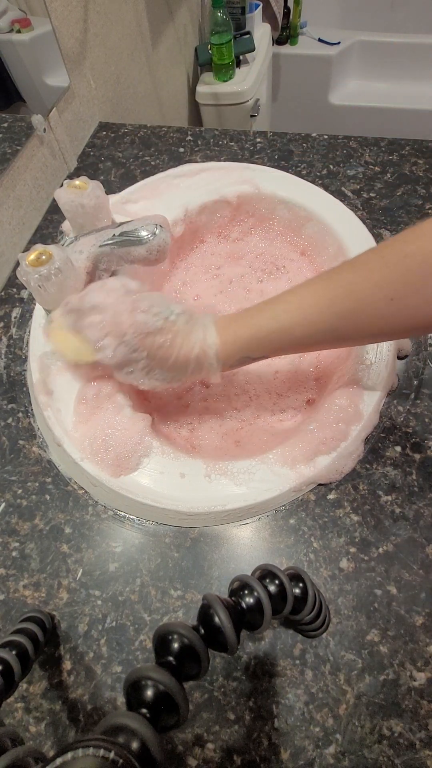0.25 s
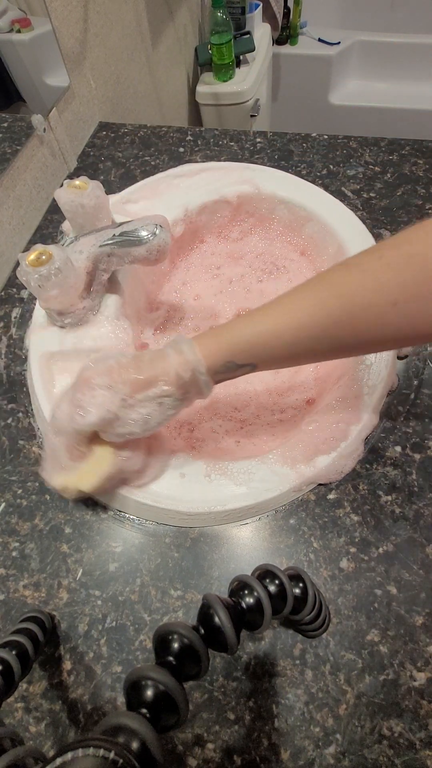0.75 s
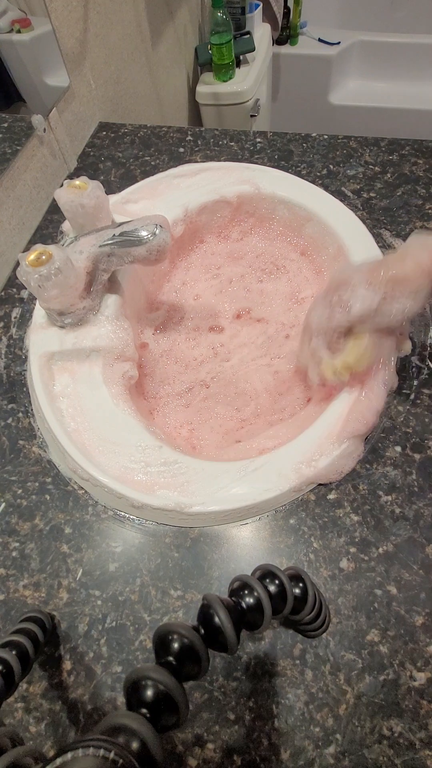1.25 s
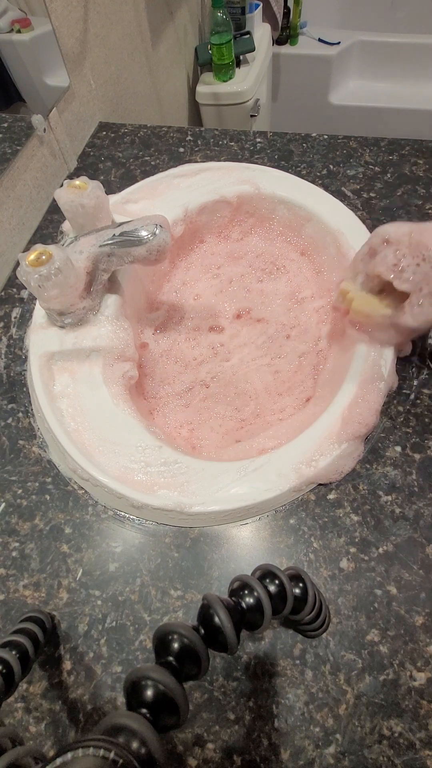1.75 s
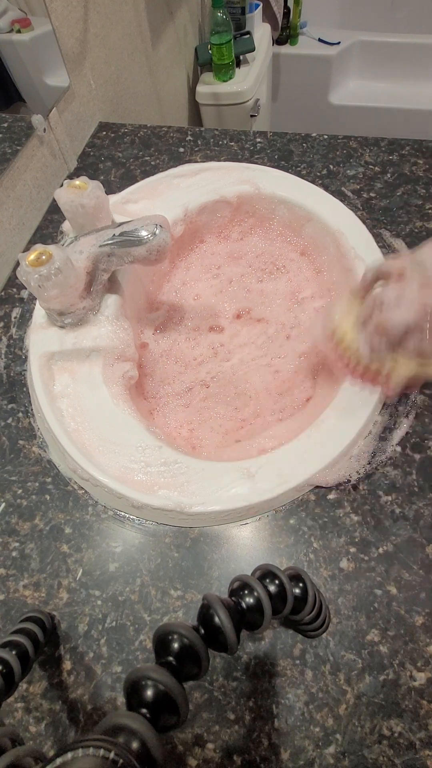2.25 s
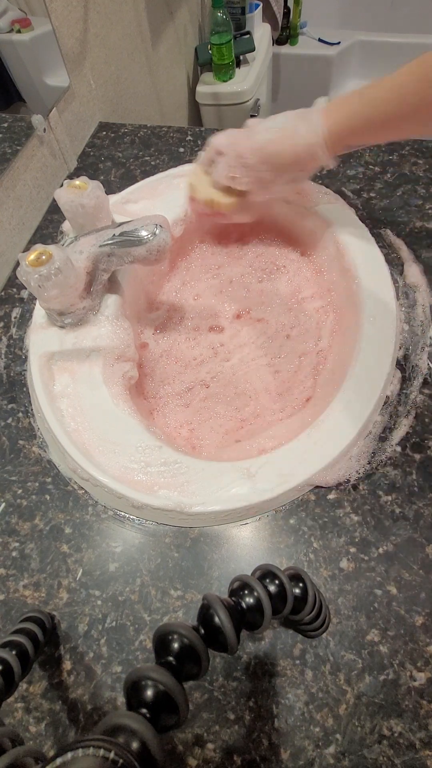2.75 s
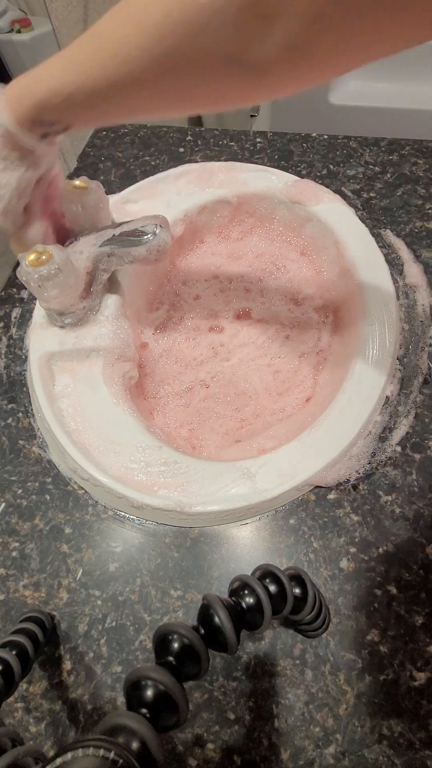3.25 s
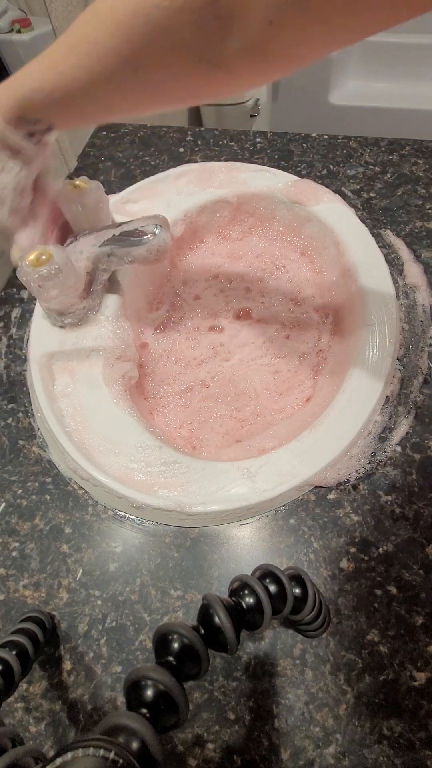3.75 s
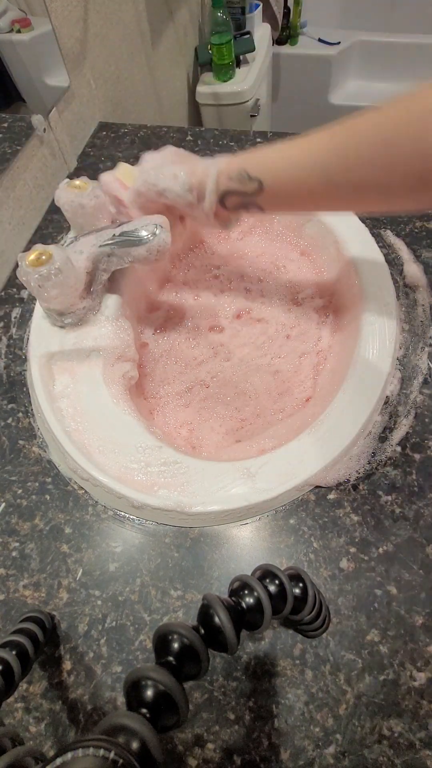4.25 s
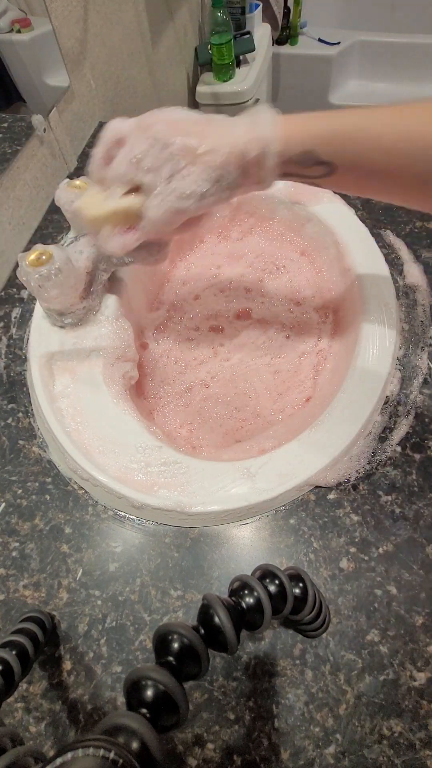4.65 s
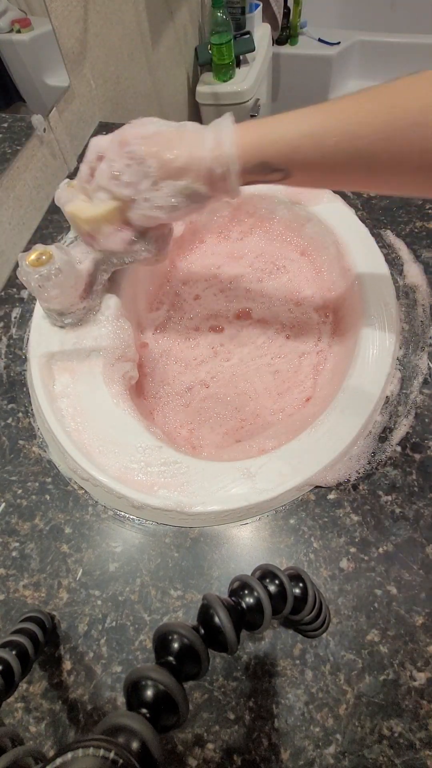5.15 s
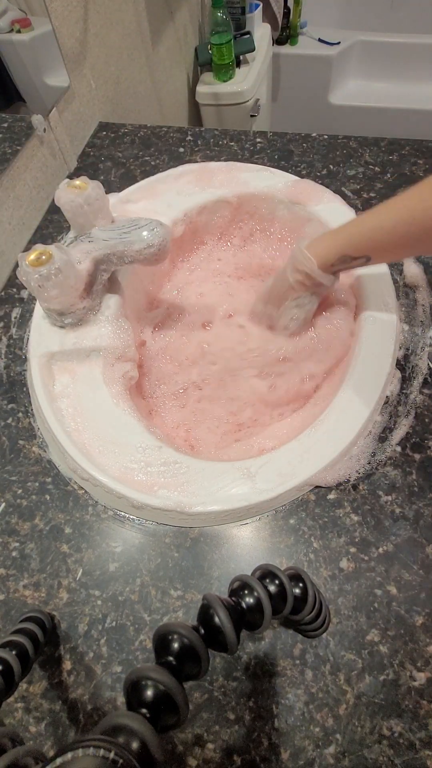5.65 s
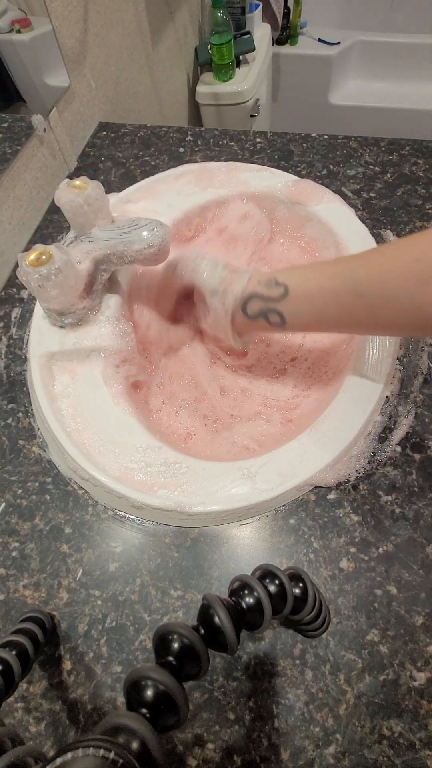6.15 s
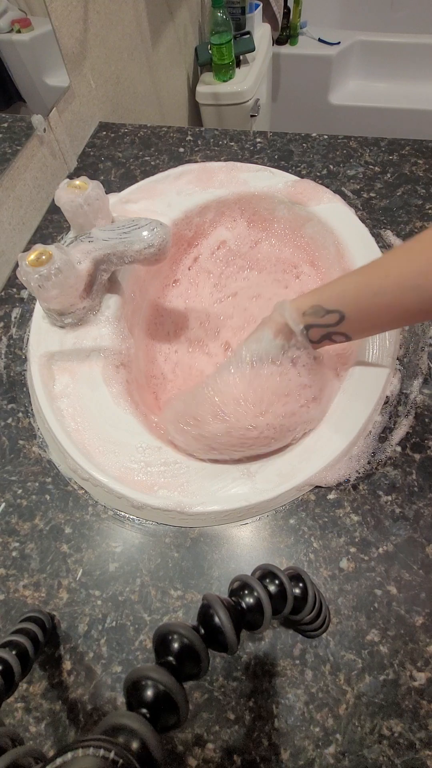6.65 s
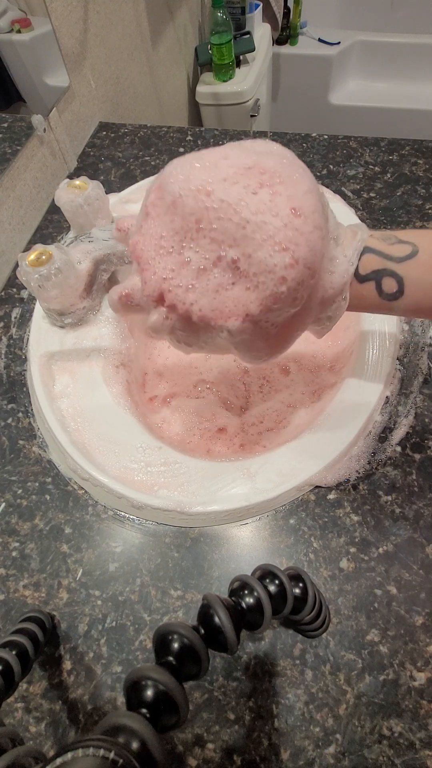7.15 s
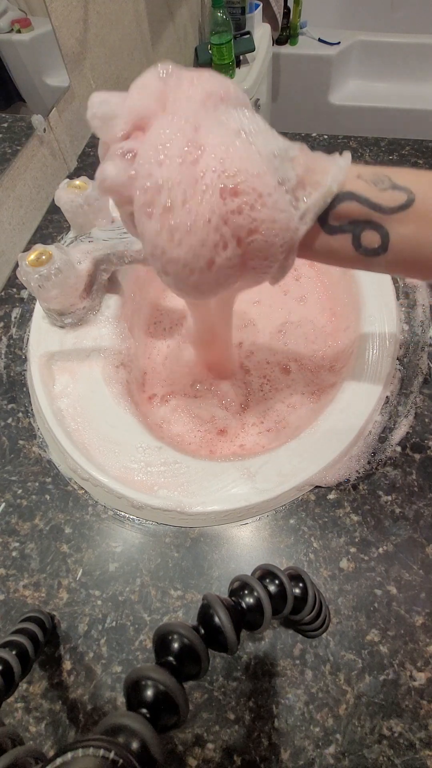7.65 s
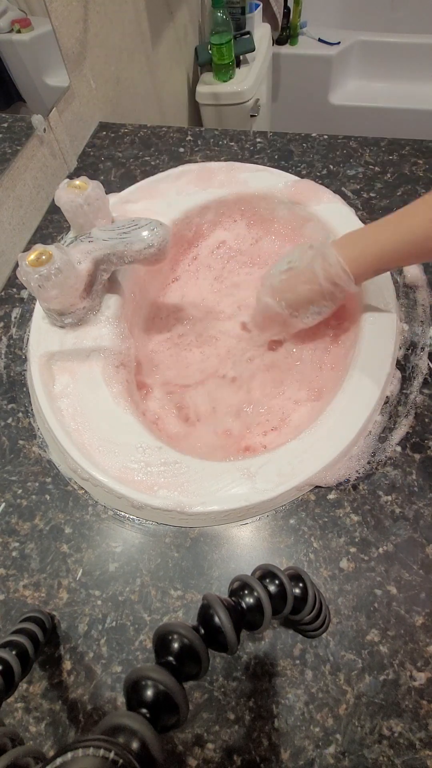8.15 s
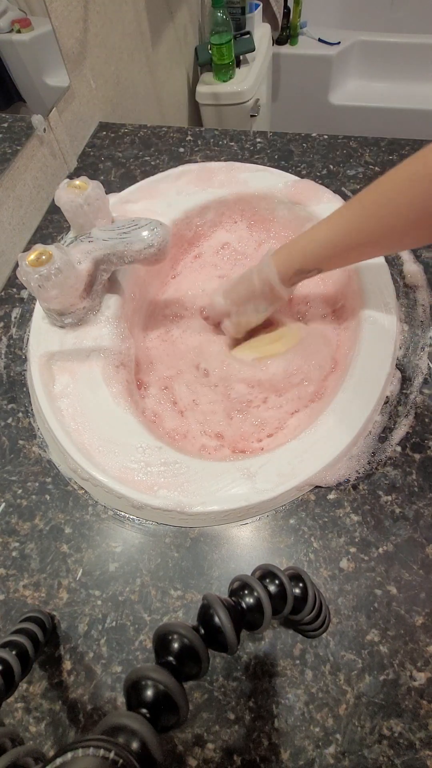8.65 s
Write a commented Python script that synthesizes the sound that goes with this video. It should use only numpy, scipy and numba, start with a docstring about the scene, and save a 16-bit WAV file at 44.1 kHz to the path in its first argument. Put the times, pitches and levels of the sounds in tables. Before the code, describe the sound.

In a small tiled bathroom, heard close by a phone on a stand, a lathered sponge rubs a basin. From 0 to 1.2 seconds wiping makes dense, wet fizz and crackle with soft low bumps; around 1.2 a brief wet squeak falls in pitch. The foam thins until a firm thud near 2.1 starts another bright, crisp wipe, fading by 3. At 3.3 a sharp bubble snap and knock begin squelchier strokes, with thuds near 3.75 and 3.9, easing by 4.6. Brisk rubbing and bumps return from 4.7 to 5.5. Then only faint crackle, tiny ticks and slight knocks remain until 7.3. From 7.4 to 8.1 a thick, hollow, gurgling squeeze swells. After a tiny lull, a thud and wet burst at 8.2 dwindle to sparse fizz by 8.9. Faint room hush lies beneath; the fizz leans right.

```python
"""Dense swarms of foam bubbles burst as a gloved hand works a lathered sponge round a bathroom basin.
It wipes, dips into the foam, squeezes and plunges back; each bubble is a short dying sine.
Driven resonances make the thuds and rumble of basin, counter and stand, heard by a phone with two ports.
A few large bubbles snap, air whistles through pores, and one wet squeak falls in pitch.
The ports colour the fizz differently; a short tiled echo and a faint room hush of noise complete it."""
import sys
import numpy as np
from scipy import signal
from scipy.fft import rfft, irfft
from scipy.io import wavfile
from scipy.ndimage import uniform_filter1d
from numba import njit

SR = 44100
rng = np.random.default_rng(int(sys.argv[2]) if len(sys.argv) > 2 else 0)


def gain_from_db(level_db):
    """Convert decibel levels to linear amplitude factors (20 dB per decade)."""
    decades = np.asarray(level_db, float) / 20
    return 10 ** decades


def file_out(sig):
    """Save sig as 16-bit WAV at sys.argv[1]."""
    # one column per channel
    cols = np.atleast_2d(sig).T
    # limit, then scale
    lim = np.clip(cols, -1, 1)
    pcm = np.round(lim * 32767).astype(np.int16)
    wavfile.write(sys.argv[1], SR, pcm)


N = 392040  # samples
HZ = np.fft.rfftfreq(N, 1 / SR)

# Bubble families: small, air pockets, large, fine, finest film, lone ticks. Each row: lowest and highest
# pitch in Hz, bursts per second, typical cycles rung, basic size scatter in dB.
BUBBLE_FAMILIES = [(2210, 5700, 9000, 2.43, 2.5), (433, 1204, 2000, 4.04, 2.0),
                   (1150, 2830, 4000, 5.6, 2.0), (5870, 8940, 9000, 2.4, 3), (9970, 19300, 6000, 3.2, 0.5),
                   (1500, 9000, 200, 1.5, 2.5)]
# How hard the sponge works the lather, one table per wipe, stir, squeeze or plunge.
# Each row: time in seconds, level of the small bubbles in dB.
STROKE_LEVELS = [
    [(0.0, -50), (0.03, -58), (0.074, -48), (0.14, -65.5), (0.208, -58), (0.22, -48.5), (0.43, -49),
     (0.508, -45.5), (0.572, -50), (0.654, -46.5), (0.662, -52), (0.7, -51)],
    [(0.71, -52.5), (1.236, -47), (1.244, -53), (1.426, -55.5), (1.444, -52.5), (1.564, -62), (1.638, -56),
     (1.774, -63), (1.84, -55), (1.918, -67.5), (2.08, -72.5), (2.1, -62.5)],
    [(2.12, -51), (2.3, -57), (2.334, -53.5), (2.77, -52), (2.788, -52.5), (2.89, -52.5), (3.068, -75.5),
     (3.096, -72), (3.278, -81.5), (3.298, -60), (3.302, -55)],
    [(3.32, -48.5), (3.356, -51.5), (3.466, -51), (3.664, -51.5), (3.706, -64), (3.744, -47.5),
     (3.884, -51), (4.232, -54), (4.244, -50.5), (4.342, -57.5), (4.368, -54.5), (4.67, -73.5)],
    [(4.68, -53.5), (4.74, -64.5), (4.774, -54), (4.848, -51.5), (4.862, -45.5), (4.898, -60),
     (4.92, -51.5), (5.026, -49.5), (5.08, -59.5), (5.212, -52), (5.228, -57.5), (5.348, -51.5)],
    [(5.368, -48.5), (5.504, -75.5), (5.524, -68), (5.532, -72), (5.678, -72), (5.712, -81), (5.756, -73.5),
     (5.844, -87), (5.862, -77.5), (6.054, -83), (6.072, -79.5), (6.235, -79)],
    [(6.245, -77), (6.259, -66.5), (6.501, -76), (6.537, -74.5), (6.783, -88.5), (6.831, -79.5),
     (6.891, -87.5), (6.929, -81), (6.937, -84), (6.963, -82), (6.991, -88), (7.27, -88)],
    [(7.28, -85.5), (7.332, -69), (7.346, -73), (7.364, -60), (7.546, -51.5), (7.586, -54), (7.672, -45.5),
     (7.69, -51.5), (7.802, -45), (8.098, -65.5), (8.146, -79), (8.16, -67)],
    [(8.172, -54), (8.176, -53), (8.196, -51), (8.206, -64.5), (8.236, -69), (8.256, -55), (8.38, -64.5),
     (8.498, -66.5), (8.718, -75.5), (8.776, -81), (8.78, -87), (8.89, -88)],
]
# State of the lather. Each row: time in seconds, fine bubbles in dB above the small ones,
# air pockets in dB above their usual share; both shift further with the stroke.
LATHER_STATE = [(0, -12, -1), (.1, -17, 1.5), (.2, -6.5, 4), (.3, -14, -1.5), (.5, -5.5, -4), (.68, -9, -3),
                (1.05, -5.5, -3.5), (1.2, -4.5, 2.5), (1.3, 3, 4.5), (1.6, -6, -3.5), (2.08, -5, -3),
                (2.13, -8, 1.5), (2.4, 3, -2.5), (2.9, -3.5, -4.5), (3.28, -0.5, -3), (3.34, -6, 6),
                (3.42, -4, 3.5), (3.5, -7.5, 8), (3.62, -7, 1), (3.75, -6, -1.5), (3.83, -2, 4),
                (3.9, -2, 3), (4.25, -6.5, -1), (4.5, -7.5, 0.5), (4.7, -4, -2.5), (4.9, -4.5, 2.5),
                (5.1, -4, -4.5), (5.37, -5.5, 1.5), (5.6, -7.5, 1), (6.2, -0.5, 4), (6.3, -3, 5.5),
                (7.25, -2, -5.5), (7.42, -23, 4.5), (7.55, -19, 4.5), (7.7, -12.5, 0.5), (8.0, -16.5, 11),
                (8.2, -11, 9), (8.5, -6.5, 0), (8.89, -2.5, -6)]
# How much lather the sponge carries, shifting the share of the larger bubbles. Each row: time in seconds, lift
# of the large bubbles in dB (the finest film gets 0.8 of it).
LATHER_LOAD = [(0, 2), (.6, 3), (1.25, 3.5), (2.0, 0), (2.3, 2.5), (3.0, -1), (3.28, -4), (3.45, 0.5),
               (4.0, -1.5), (4.6, -2), (5.4, -0.5), (6.0, -1.5), (7.3, -2.5), (7.9, -0.5), (8.89, -3)]
# How far the sponge hangs over the hollow of the bowl. Each row: time in seconds, share from 0 to 1.
OVER_HOLLOW = [(0, 0.41), (5.3, 0.6), (5.6, 0.7), (7.2, 0.1), (7.4, 1), (8.1, 0.99), (8.3, 0.8), (8.89, .6)]
# Where the sponge is. Each row: time in seconds, left minus right in dB before a fixed offset.
SPONGE_PLACE = [(0.0, -6.5), (0.67, -9), (1.41, -6), (2.05, -10), (2.35, -5.5), (3.24, -11), (3.44, -8.5),
                (5.62, -9), (5.72, -10.5), (6.93, -12.5), (7.25, -9.5), (7.95, -5.5), (8.89, -13)]
# Air in the bowl of the basin. Each row: resonance in Hz, width in Hz, lift in dB.
BOWL_AIR = [(290, 57, 18), (475, 150, -5.5), (737.4, 26, 10.5), (885, 70, 6), (1070, 90, 3), (1500, 73, -1),
            (1910, 160, 1.5)]
# Colour of the left port. Each row: frequency in Hz, level in dB.
LEFT_COLOUR = [(1200, -5), (2000, -7), (3000, -8), (4200, -7), (5500, -7), (6500, -9), (8000, -6.5),
               (9500, -9), (12000, -5), (15500, -11.5)]
# Colour of the right port. Each row: frequency in Hz, level in dB.
RIGHT_COLOUR = [(1200, -5), (2000, -5), (2900, -0.36), (3700, 3), (4400, 2), (5200, 5), (6100, -4.5),
                (7000, 3), (8000, 3.5), (9400, -3.5), (10800, 0), (12000, -2), (13500, -13), (15500, -11.5)]
# Ring of the right port's duct. One row: frequency in Hz, width in Hz, lift in dB.
RIGHT_DUCT = (3700, 260, 5)
# Hand and sponge leaning on the basin. Each row: start in seconds, length in seconds, level in dB,
# octaves below the bowl's ring that shake most.
LEANING_SHOVES = [(0, 0.062, -56.5, 0.4), (0.204, 0.076, -52.5, 0.4), (0.361, 0.15, -50.5, .4),
                  (.44, .04, -48.5, 1.2), (0.476, 0.066, -38, 2.5), (0.624, 0.04, -46.5, 0),
                  (0.685, 0.053, -53, 2.2), (.85, 0.39, -67.5, 1.7), (1.13, 0.055, -54.5, 2),
                  (1.245, 0.065, -51, -0.6), (1.36, 0.18, -60.5, 0.8), (1.6, 0.3, -70.5, 0.5),
                  (1.865, .05, -57.5, .7), (2.111, .06, -38, .8), (2.289, 0.43, -62, .4),
                  (2.68, 0.032, -51, 0.05), (2.759, 0.15, -50.5, 0.5), (3.05, 0.074, -71, 2.2),
                  (3.315, 0.046, -41, -0.1), (3.434, 0.18, -51.5, 0.2), (3.58, 0.11, -47, 0.8),
                  (3.748, 0.079, -42.5, .4), (3.872, 0.09, -41, 0.95), (4.08, 0.16, -58.5, 0.8),
                  (4.314, .22, -62.5, 0.2), (4.682, 0.088, -43.5, 2.4), (4.786, 0.095, -41.5, 1.6),
                  (4.913, 0.17, -47.5, 1.55), (5.118, 0.041, -40, 0.63), (5.202, 0.11, -48.5, 1.1),
                  (5.352, 0.05, -45, 0.7), (5.45, .05, -60, 2.2), (5.607, 0.016, -53.5, 0.36),
                  (5.715, 0.074, -60, .1), (5.927, 0.027, -54, 0.2), (6.083, .13, -63, 0.2),
                  (6.24, 0.032, -47.5, -0.6), (6.343, 0.18, -58.5, 0.2), (6.695, .04, -64, 1.3),
                  (6.788, 0.088, -64.5, 2.5), (7.18, .12, -71.5, 3), (7.375, 0.12, -63.5, 0.1),
                  (7.506, 0.41, -48.5, -1.25), (7.914, .2, -71, 0.2), (8.18, .02, -39, 0.8),
                  (8.25, 0.057, -46, 3), (8.545, 0.095, -66, 0.3)]
# Bowl, counter and stand in turn. Each row: octaves below the bowl's ring,
# time to get moving in seconds, level in dB when left alone.
RUMBLE_PARTS = [(0, 0.0099, -85), (1, 0.017, -86), (2.4, 0.036, -77)]
# Resonances of counter (first three rows) and basin. Each row: pitch in Hz, strength in dB (rumble only),
# seconds to fade by 60 dB (bumps ring shorter).
COUNTER_MODES = [(118, 9, 0.55), (137.5, 7, 0.98), (174, 3.5, 0.37), (232.3, 0, 0.32), (256, 3.5, 0.56),
                 (318, 7, 0.13), (342.4, -8.5, 0.34), (443.5, -7.5, .25), (625, -10.5, 0.1)]
# Sway of the stand. Each row: pitch in Hz, strength in dB, seconds to fade by 60 dB.
STAND_MODES = [(44.3, -14.5, 0.31), (58.6, -7, 0.34), (64, -14.5, 0.18)]
# What the jointed stand passes up to the phone. Each row: frequency in Hz, level in dB.
STAND_PATH = [(18, -43), (32, -13), (42, -6.5), (64, -5.5), (86, -18.5), (110, -12), (400, 0), (700, 1.5),
              (2000, -58.5)]
# Room hush, its spectrum before the overall level is set. Each row: frequency in Hz, dB per Hz.
HUSH_SPECTRUM = [(18, -21), (30, 3.5), (127, -5.5), (227, -20), (287, 4), (404, -4.5), (702, -1),
                 (2010, -34), (3770, -29.5), (6210, -56), (16000, -33.5)]
# Hand or sponge bumping the basin. Each row: time in seconds, peak in dB before the stand passes it on,
# pitch in Hz that rings most.
BASIN_BUMPS = [(0.224, -38.5, 322), (0.408, -38, 264), (0.636, -38, 256), (1.259, -37, 261),
               (1.886, -42.5, 120), (2.111, -19, 178), (2.131, -22.5, 182), (2.149, -25, 176),
               (2.697, -32, 140), (3.323, -26.5, 284), (3.333, -34.5, 260), (3.659, -38, 124),
               (3.755, -30, 256), (3.781, -31, 256), (3.883, -26, 169), (3.913, -21.5, 174),
               (3.942, -32, 127), (4.68, -30.5, 318), (4.799, -32, 118), (4.856, -28, 270),
               (5.134, -33, 317), (5.394, -28, 256), (5.606, -43.5, 267), (5.723, -46, 350),
               (5.93, -41, 252), (6.242, -32, 358), (6.342, -39.5, 248), (6.69, -50, 258),
               (8.175, -25.5, 267), (8.182, -18.5, 190), (8.191, -32, 110)]
# Brief whistles of air forced through a pore. Each row: centre time in seconds, length in seconds,
# centre pitch in Hz, width in Hz, level in dB before each port's own gain.
PORE_WHISTLES = [(0.648, 0.0056, 4740, 700, -43), (1.323, 0.039, 10700, 900, -56),
                 (2.565, 0.073, 7900, 700, -59), (3.752, 0.055, 3720, 900, -54),
                 (4.26, 0.087, 8100, 1800, -56.5), (4.925, 0.0099, 8200, 5000, -49.5)]
# Air squeezed from the sponge against the rim, a falling squeak that clears.
# Each row: time in seconds, pitch in Hz, level in dB, pitch flutter from 0 to 1.
RIM_SQUEAK = [(1.175, 1450, -52, .14), (1.198, 1280, -40, .06), (1.218, 1120, -41, .05),
              (1.228, 880, -35, .02), (1.248, 740, -36, .02), (1.262, 690, -52, .03)]
# Single large bubbles snapping. Each row: time in seconds, basic level in dB, pitch in Hz.
BUBBLE_SNAPS = [(2.115, -26, 1480), (3.2968, -47, 5130), (3.3107, -17, 8240), (3.8273, -33, 5120),
                (3.882, -29, 6860), (4.68, -47, 4990), (4.774, -53, 3680), (5.3561, -24.5, 2810),
                (5.3572, -29, 1300), (5.52, -52, 3800), (5.6125, -55, 3770), (5.673, -58, 4080),
                (5.9334, -61, 1250), (6.2477, -45, 1250), (7.328, -59.5, 3380), (7.3644, -47, 3620),
                (7.733, -32, 1530), (7.9844, -40, 2260), (8.1756, -44, 3510), (8.192, -27.5, 1290),
                (8.2565, -56, 1460), (8.505, -53, 3630), (8.551, -53, 4050)]

PORT_LAG = 13  # samples by which the right port hears later
BRISK_DB = -52  # small-bubble level of a brisk wipe
POCKET_DB, POCKET_PER_DB = -4.5, -0.2  # air pockets: dB share in a brisk wipe; they fade less than the fizz
LARGE_DB, LARGE_PER_DB, LARGE_PER_POCKET = -4, 0.03, 0.66  # they need force, and come with the air pockets
FINE_PER_DB, TICK_DB = -0.0048, -16  # fine bubbles linger in a weak stroke; share of the lone ticks
SHOVE_RELEASE_DB_PER_S, SHOVE_DB_PER_OCTAVE = 172.5, 7


def curve(table):
    """Join the columns of a table by straight lines in time."""
    s, *columns = np.transpose(table)
    return [np.interp(np.arange(N) / SR, s, c) for c in columns]


def strokes(tables):
    """Join tables; each holds its last row until just before the next contact lands."""
    rows = list(tables[0])
    for table in tables[1:]:
        hold_until = max(table[0][0] - .003, rows[-1][0])
        rows += [(hold_until, *rows[-1][1:]), *table]
    return curve(rows)


def shape(points):
    """Give dB at every frequency from (Hz, dB) points."""
    hz, db = np.transpose(points)
    return np.interp(np.log(HZ + 1), np.log(hz), db)


def bump(hz, width, db):
    """Give the dB lift of one resonance."""
    return db / (1 + (2 * (HZ - hz) / width) ** 2)


def causal(db):
    """Turn a dB spectrum into a minimum-phase response, so clicks ring after they start."""
    cepstrum = irfft(np.log(gain_from_db(db)), N)
    cepstrum[1:N // 2] *= 2
    cepstrum[N // 2 + 1:] = 0
    return np.exp(rfft(cepstrum))


def unit(x, low_hz, high_hz):
    """Scale so that the middle of the stereo pair has rms 1 within a band."""
    power = abs(rfft(np.atleast_2d(x).mean(axis=0))) ** 2
    return x * N / np.sqrt(2 * power[(HZ > low_hz) & (HZ < high_hz)].sum())


def walk(rate):
    """Wander smoothly between random levels, about rate of them a second; spread near 1."""
    k = int(SR / rate)
    steps = np.repeat(rng.standard_normal(N // k + 1), k)
    return 1.4 * uniform_filter1d(steps, k)[:N]


def ring(push, hz, t60):
    """One damped resonance, set going by a push."""
    pole = np.exp(2j * np.pi * hz / SR - np.log(1000) / (t60 * SR))
    return signal.lfilter([1], [1, -pole], push).imag


@njit
def grains(start, hz, cycles, size, lag, n, sr):
    """Damped sines, each heard at the left port and a little later at the right."""
    out = np.zeros((2, n + 8192))
    for k in range(len(start)):
        pole = np.exp((2j * np.pi - 3 / cycles[k]) * hz[k] / sr)
        z, i = size[k] + 0j, start[k]
        for j in range(min(int(2 * cycles[k] * sr / hz[k]), 4000)):
            out[0, i + j] += z.imag
            out[1, i + j + lag[k]] += z.imag
            z *= pole
    return out[:, :n]


def ports(x, pan_db):
    """Colour sound for the two ports: the left one shaded, the right one ringing in its duct."""
    thin_db = -20 * np.log10(1 + (235.0 / (HZ + 1)) ** 2)  # small bubbles move little low air
    left = causal(shape(LEFT_COLOUR) + thin_db)
    right = causal(shape(RIGHT_COLOUR) + bump(*RIGHT_DUCT) + thin_db)
    return irfft(rfft(x) * np.array([left, right]), N) * gain_from_db(np.array([pan_db, -pan_db]) / 2)


def foam(pan_db):
    """Swarms of bursting bubbles, spread through the lather so each has its own lag between the ports."""
    small_db = strokes(STROKE_LEVELS)[0]
    force_db = small_db - BRISK_DB
    load_db = curve(LATHER_LOAD)[0]
    fine_db, air_db = curve(LATHER_STATE)
    fine_db = fine_db + FINE_PER_DB * force_db
    pocket_db = POCKET_DB + POCKET_PER_DB * force_db + air_db
    large_db = LARGE_DB + LARGE_PER_DB * force_db + LARGE_PER_POCKET * air_db + load_db
    # the finest film follows the fine bubbles more steeply
    film_db = 1.46 * np.minimum(fine_db, 3.0) - 2.0 + .8 * load_db
    # lather hanging free bursts less evenly than lather being wiped
    loose = 0.54 + 0.81 * curve(OVER_HOLLOW)[0]
    shares = (0, pocket_db, large_db, fine_db, film_db, TICK_DB)
    out, surge = 0, walk(45)
    for (low, high, rate, cycles, scatter_db), share_db in zip(BUBBLE_FAMILIES, shares):
        when, pitch, luck, place, life = rng.random((int(rate * N / SR), 5)).T
        start = (when * N).astype(np.int64)
        hz = np.minimum(low * (high / low) ** pitch, .45 * SR)
        size_db = -scatter_db * loose[start] * (np.log(luck + .002) + 2.5)  # many weak, few strong
        size = gain_from_db(size_db) * np.sqrt(hz)
        lags = np.clip(PORT_LAG + 22.0 * (2 * place - 1) ** 3, 0, 99).astype(np.int64)
        swarm = ports(grains(start, hz, cycles * (.5 + life), size, lags, N, 1. * SR), pan_db)
        # a bubble radiates poorly below its own pitch
        swarm = irfft(rfft(swarm) / np.sqrt(1 + (0.54 * low / (HZ + 1)) ** 4), N)
        level_db = small_db + share_db + 0.49 * surge + 1.64 * walk(25)
        out = out + unit(swarm, low, high) * gain_from_db(level_db)
    return out


def hollow(x):
    """The bowl's air resonates and colours what sounds above it."""
    share = np.clip(curve(OVER_HOLLOW)[0], 0, 1)
    colour = causal(sum(bump(*mode) for mode in BOWL_AIR))
    return (1 - share) * x + share * irfft(rfft(x) * colour, N)


def tiles(x):
    """Short dense echo of the small tiled room: fading noise, different at each port."""
    s = np.arange(int(.2 * SR)) / SR
    tail = rng.standard_normal((2, len(s))) * gain_from_db(-60 * s / .12) * (s > .002)
    tail = tail / np.sqrt((tail ** 2).sum(axis=1, keepdims=True))
    return signal.fftconvolve(x, tail, axes=1)[:, :N]


def held(start, length, db, attack_s, rest_db):
    """Level in dB of overlapping shoves: each rises, holds and dies away."""
    grid_s = np.arange(0, N / SR + .002, .001)
    since = grid_s - start[:, None]
    level = db[:, None] - SHOVE_RELEASE_DB_PER_S * np.maximum(since - length[:, None], 0)
    rise = np.clip(since / attack_s + .5, 0, 1) ** 2
    total = 10 * np.log10(((rise * gain_from_db(level)) ** 2).sum(axis=0) + gain_from_db(2 * rest_db))
    return np.interp(np.arange(N) / SR, grid_s, total)


def rumble(mount):
    """Uneven drag shakes the resonances of bowl and counter; the stand sways below them."""
    start, length, shove_db, depth = np.transpose(LEANING_SHOVES)
    parts = ((COUNTER_MODES[3:], 205, 400), (COUNTER_MODES[:3], 100, 200), (STAND_MODES, 35, 75))
    out = 0
    for (modes, low, high), (below, attack_s, rest_db) in zip(parts, RUMBLE_PARTS):
        part_db = shove_db - SHOVE_DB_PER_OCTAVE * abs(depth - below)
        level_db = held(start, length, part_db, attack_s, rest_db)
        drags = rng.standard_normal((2, N)) * gain_from_db(3.0 * walk(25))  # the grip catches and slips
        shaken = [sum(gain_from_db(g) * ring(drag, hz, t60) for hz, g, t60 in modes) for drag in drags]
        both, apart = (irfft(rfft(x) * mount, N) for x in shaken)
        # the hand's steady pressure evens out the rumble
        both = both / uniform_filter1d(both ** 2, int(.12 * SR)) ** 0.22
        apart = unit(apart, low, high) * np.array([[1], [-1]])  # opposite at the two ports
        out = out + gain_from_db(level_db) * unit(unit(both, low, high) + 0.3 * apart, low, high)
    return out


def lean(x):
    """The right port is shaken harder, most so by the sway."""
    lean_db = 7.9 / (1 + (HZ / 44.0) ** 2) + 0.6
    return irfft(rfft(x) * gain_from_db(np.array([-lean_db, lean_db]) / 2), N)


def hush():
    """Room air and microphone hiss, alike left and right only in the bass."""
    mid, side = rfft(rng.standard_normal((2, N))) * gain_from_db(shape(HUSH_SPECTRUM))
    side = side * np.minimum(HZ / 1030.0, 1)
    return gain_from_db(-72.5) * unit(irfft(np.array([mid + side, mid - side]), N), 30, 16000)


def bumps(mount):
    """Soft contacts a few ms long set the resonances of counter and basin ringing."""
    signs = rng.choice([-1., 1.], (len(BASIN_BUMPS), len(COUNTER_MODES)))  # each bump lands elsewhere
    contact = np.hanning(int(0.0027 * SR))
    push = np.concatenate([contact / contact.sum(), np.zeros(SR // 2)])
    thuds = np.zeros(N + SR)
    # lather in the bowl deadens the ring
    cushion = 1 - .75 * np.clip(curve(OVER_HOLLOW)[0], 0, 1)
    for (s, peak_db, centre_hz), bump_signs in zip(BASIN_BUMPS, signs):
        at = int(s * SR)
        thud = 0
        for sign, (hz, _, t60) in zip(bump_signs, COUNTER_MODES):
            favour = gain_from_db(-14.0 * abs(np.log2(hz / centre_hz)))  # modes near the bump's own pitch
            # the resting hand shortens the ring
            thud = thud + sign * favour * ring(push, hz, 0.4 * cushion[at] * t60)
        thuds[at:][:len(push)] += gain_from_db(peak_db) * thud / abs(thud).max()
    return irfft(rfft(thuds[:N]) * mount, N)


def whistles():
    """Air forced through pores: narrow hiss under a short swell, louder at the right port."""
    s, noise, out = np.arange(N) / SR, rfft(rng.standard_normal(N)), 0
    for at, length, hz, width, db in PORE_WHISTLES:
        hiss = unit(irfft(noise * np.exp(-(2 * (HZ - hz) / width) ** 2), N), 0, SR)
        out = out + gain_from_db(db) * hiss * np.exp(-(2 * (s - at) / length) ** 2)
    return np.array([gain_from_db(-23.0) * out, gain_from_db(13.0) * np.roll(out, PORT_LAG)])


def squeak():
    """Wet sponge flutters like a reed: a wavering tone with blurred overtones."""
    hz, db, rough = curve(RIM_SQUEAK)
    s = np.arange(N) / SR
    phase = 2 * np.pi * np.cumsum(hz * (1 + rough * walk(900))) / SR
    sounding = (s > RIM_SQUEAK[0][0]) & (s < RIM_SQUEAK[-1][0])
    flutter = 1 + .35 * walk(250)
    second = .4 * (1 + .7 * walk(300)) * np.sin(2 * phase)
    third = .2 * (1 + .7 * walk(300)) * np.sin(3 * phase)
    return sounding * gain_from_db(db) * flutter * (np.sin(phase) + second + third)


def pops(pan_db):
    """Lone big bubbles: a snap of a few cycles at their pitch with a sharp crack on top."""
    s, db, hz = np.transpose(BUBBLE_SNAPS)
    start, one = (s * SR).astype(np.int64), np.ones(len(s))
    lags = np.full(len(s), PORT_LAG)
    snap = grains(start, hz, 6.4 * one, gain_from_db(db + 8.5), lags, N, 1. * SR)
    crack = grains(start, 3800.0 * one, 0.52 * one, gain_from_db(db + 12.5), lags, N, 1. * SR)
    return ports(snap + crack, pan_db)


def scene():
    """Add up all sources at the two ports, through the air and through the stand."""
    pan_db = curve(SPONGE_PLACE)[0] + 7.34  # the ports' own colour already leans right
    mount = causal(shape(STAND_PATH))
    airborne = hollow(foam(pan_db) + pops(pan_db)) + squeak() + whistles()
    echo = gain_from_db(-12) * tiles(airborne)
    shaking = lean(rumble(mount) + bumps(mount))
    return gain_from_db(-1.71) * airborne + echo + shaking + hush()


def top_cut(x):
    """Nothing passes above the cut-off."""
    return signal.sosfilt(signal.butter(12, 16640, fs=SR, output="sos"), x)


def record(dry):
    """The phone cuts off the top of the treble."""
    top_hz = 15760
    mix = irfft(rfft(dry) * (HZ < top_hz), N)
    return top_cut(mix)


dry = scene()
out = record(dry)
file_out(out)
```